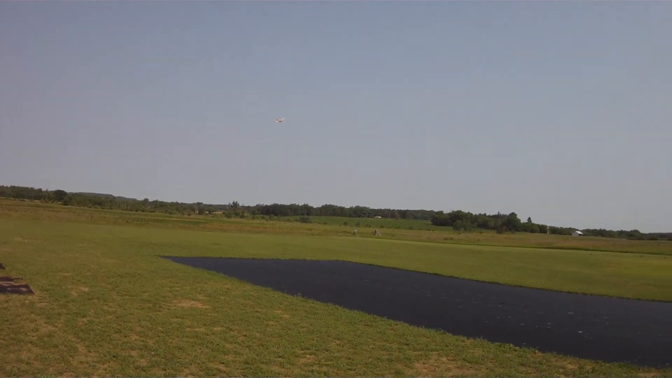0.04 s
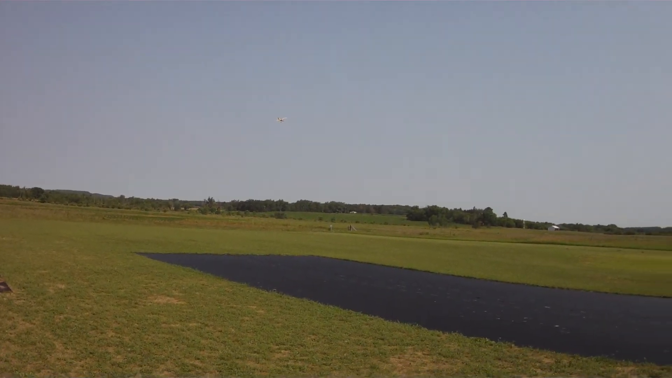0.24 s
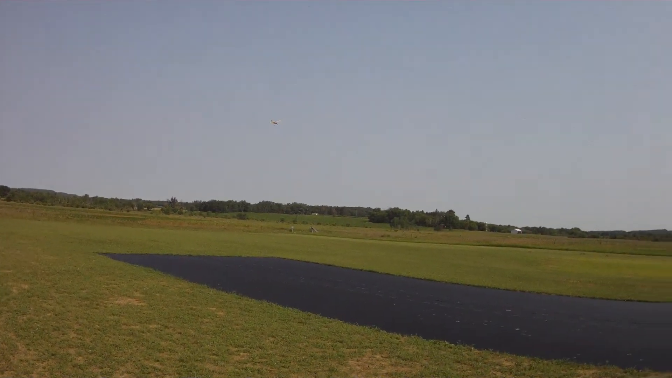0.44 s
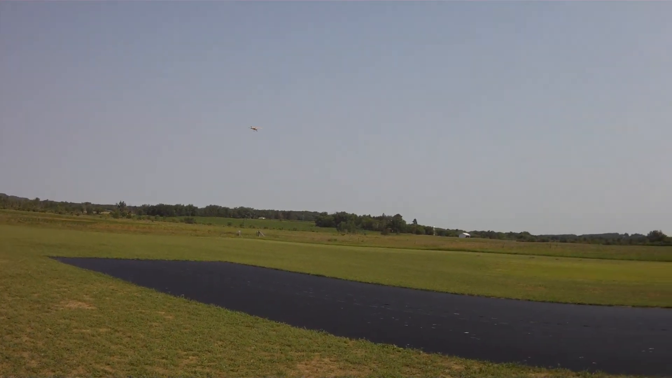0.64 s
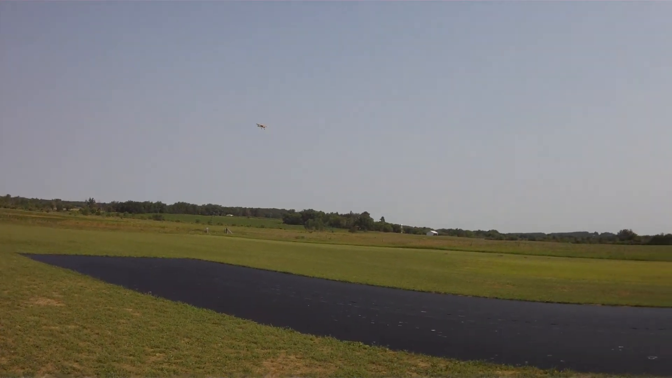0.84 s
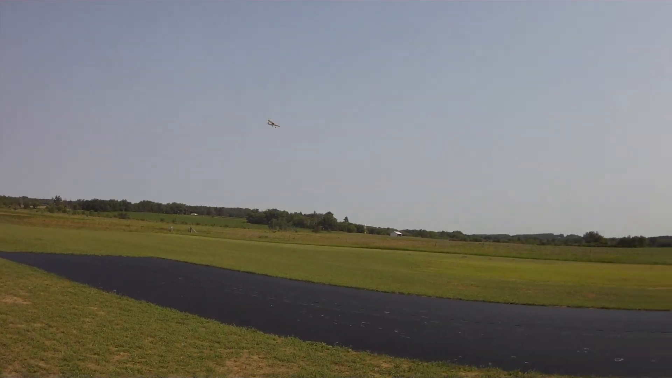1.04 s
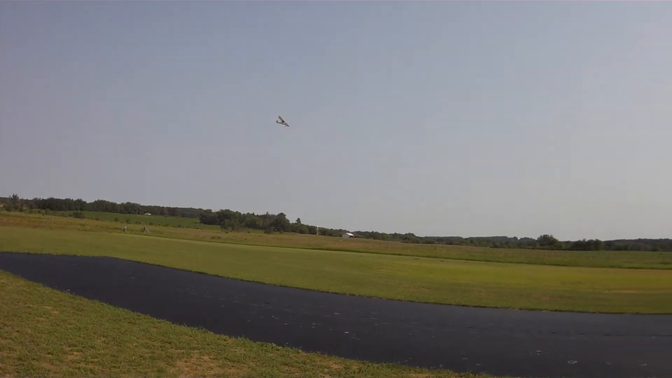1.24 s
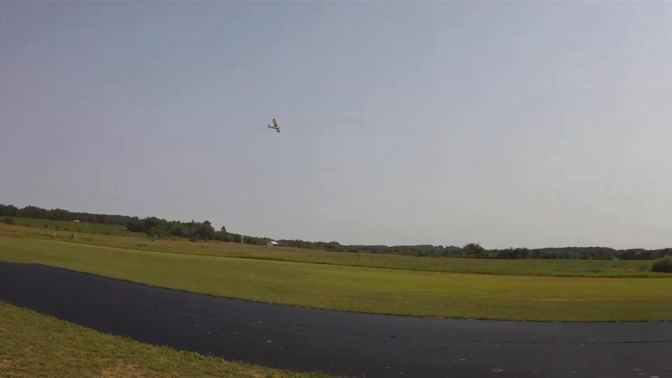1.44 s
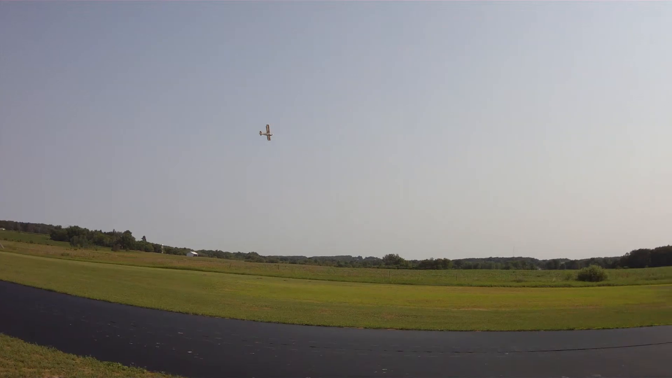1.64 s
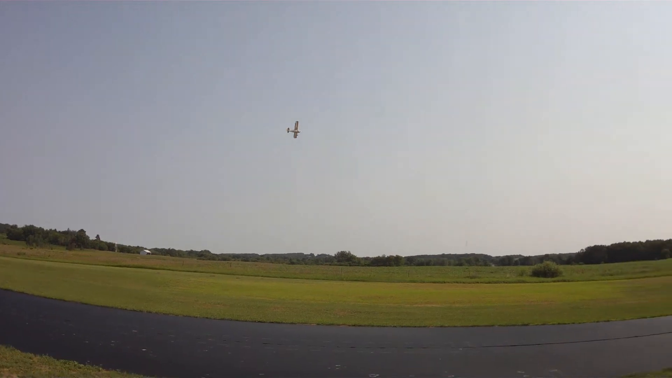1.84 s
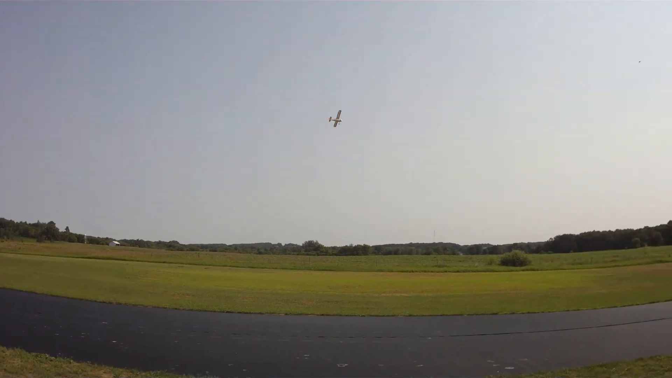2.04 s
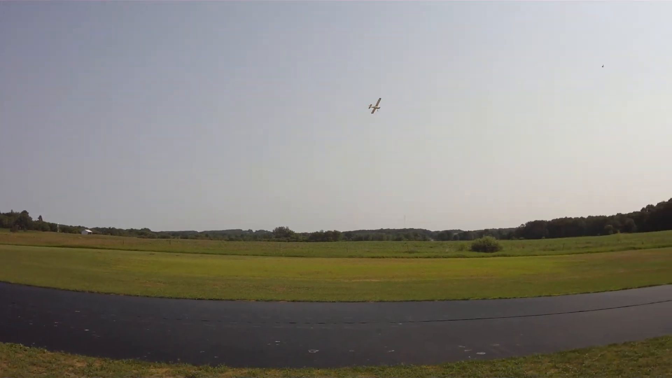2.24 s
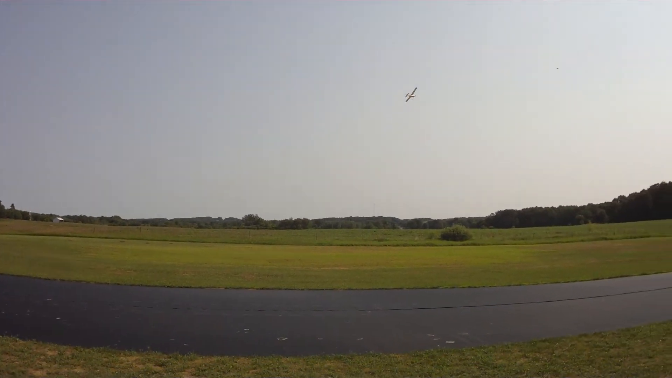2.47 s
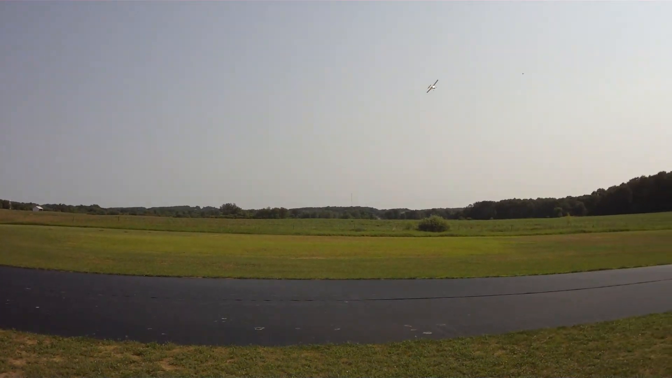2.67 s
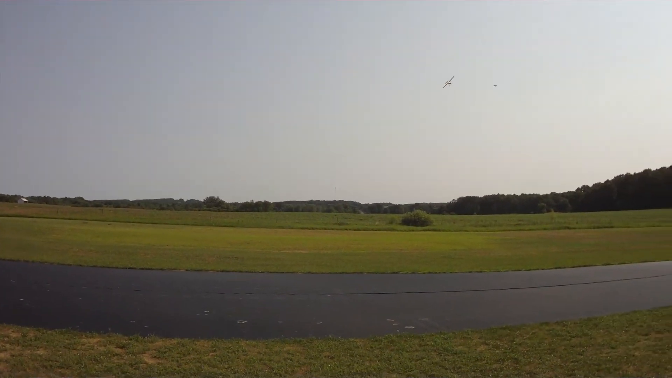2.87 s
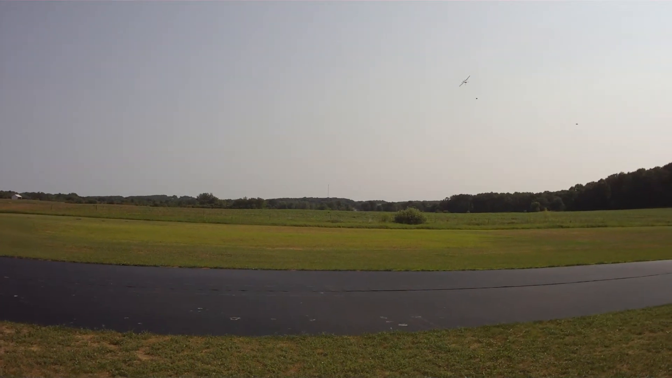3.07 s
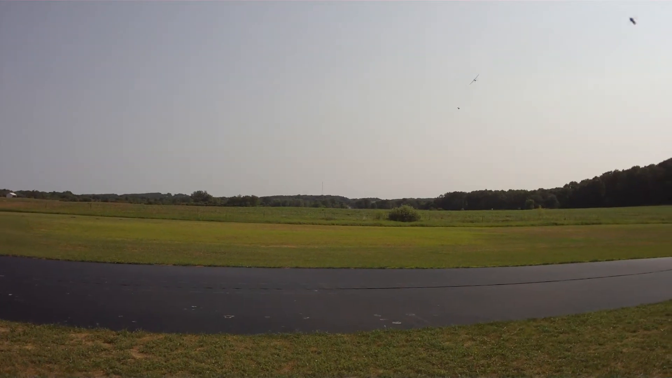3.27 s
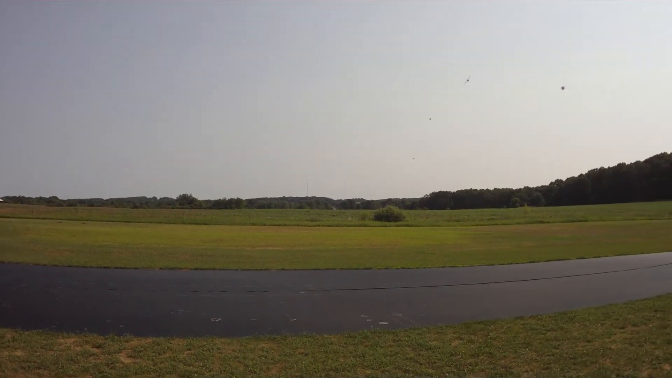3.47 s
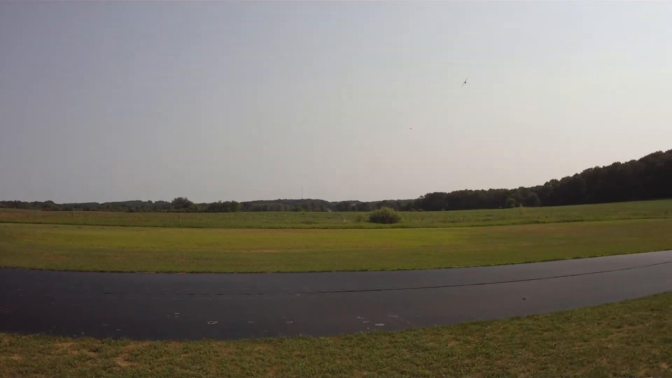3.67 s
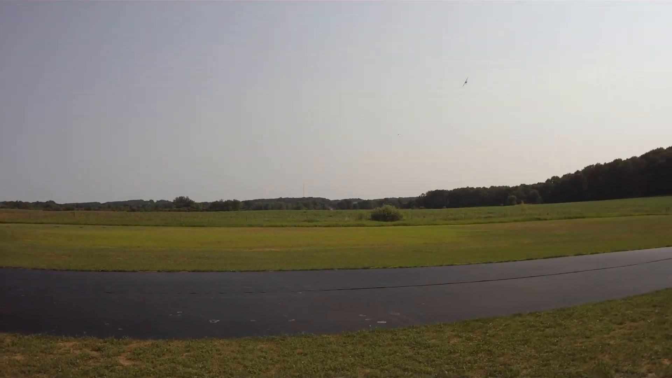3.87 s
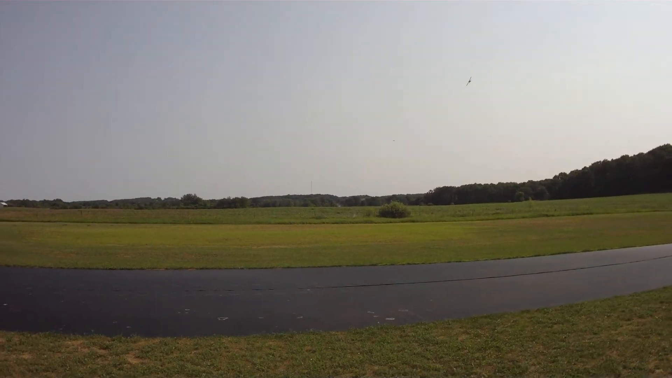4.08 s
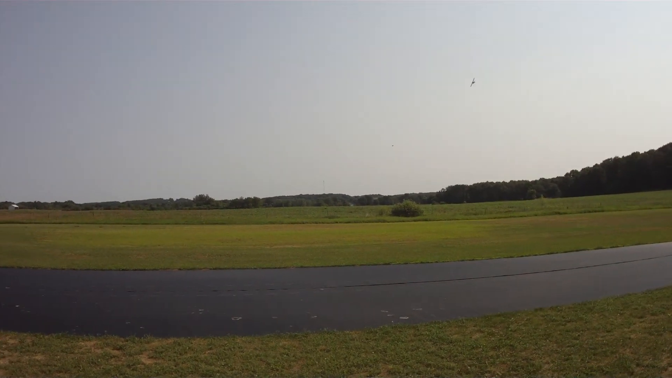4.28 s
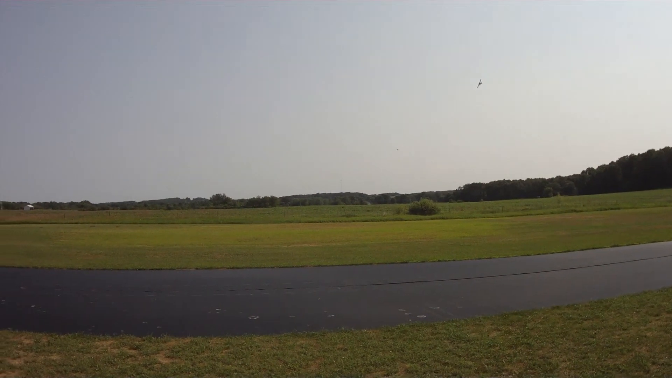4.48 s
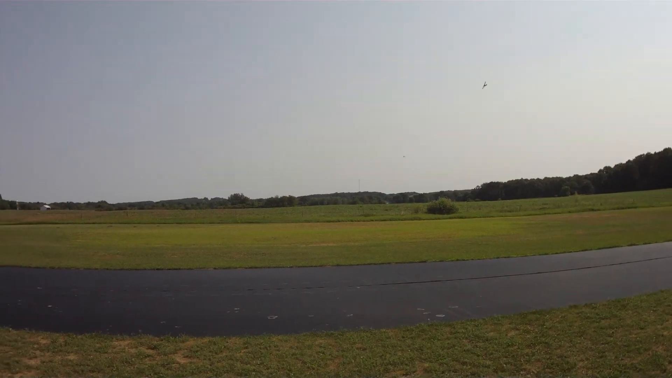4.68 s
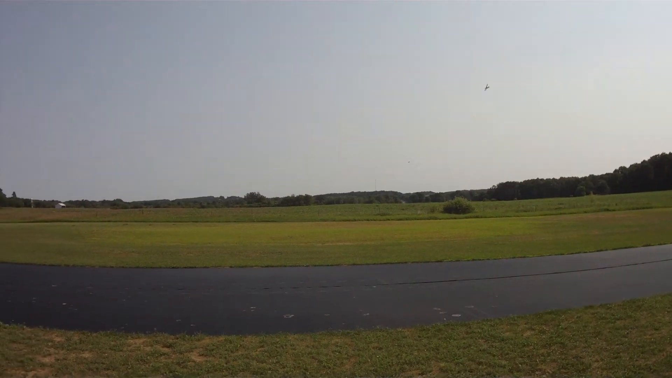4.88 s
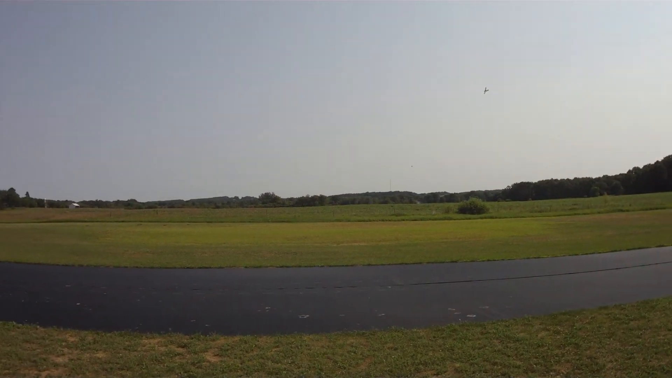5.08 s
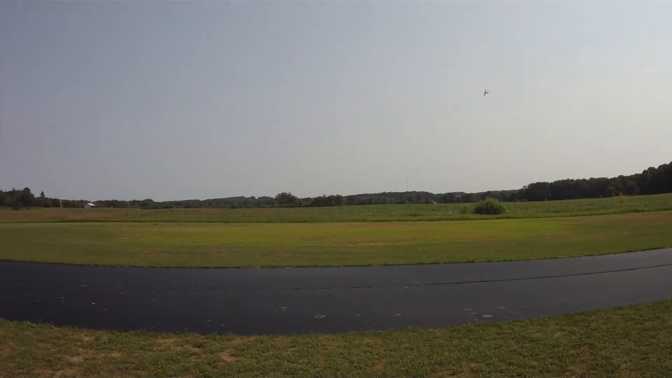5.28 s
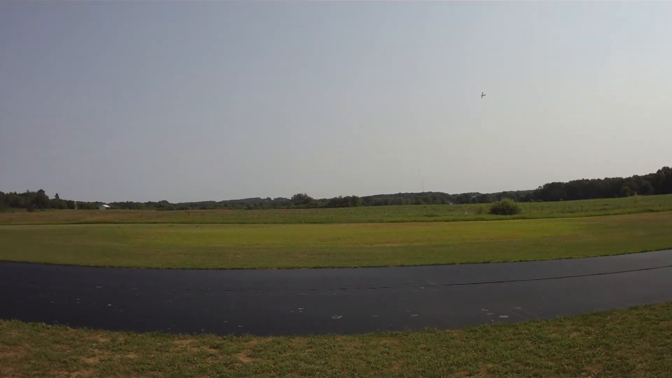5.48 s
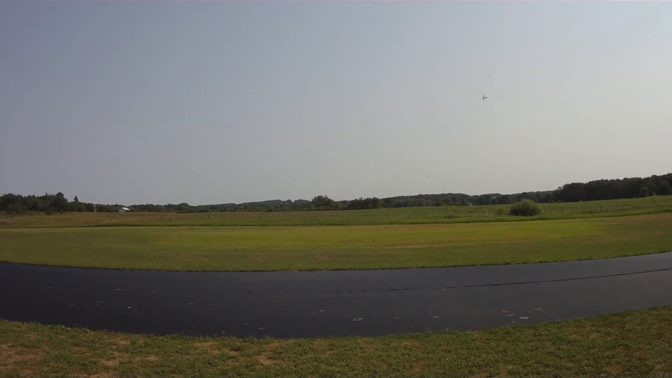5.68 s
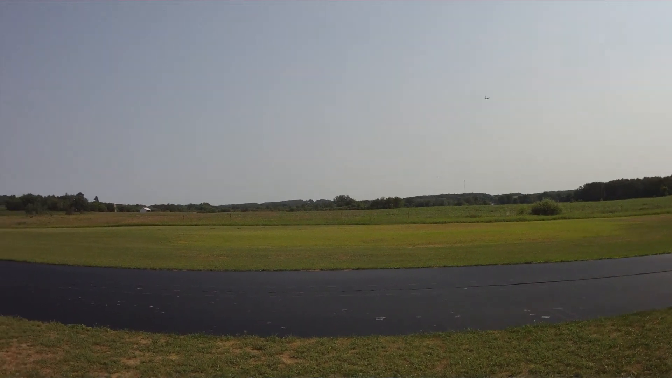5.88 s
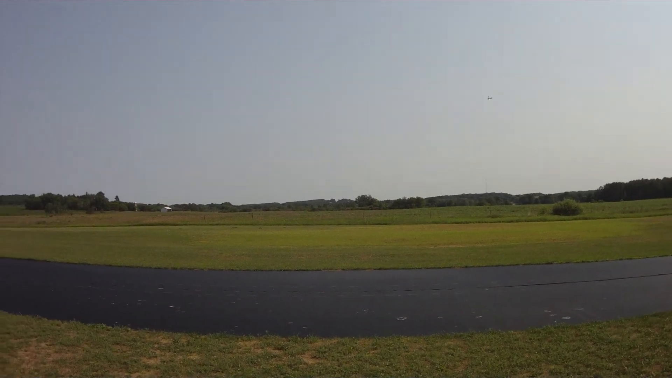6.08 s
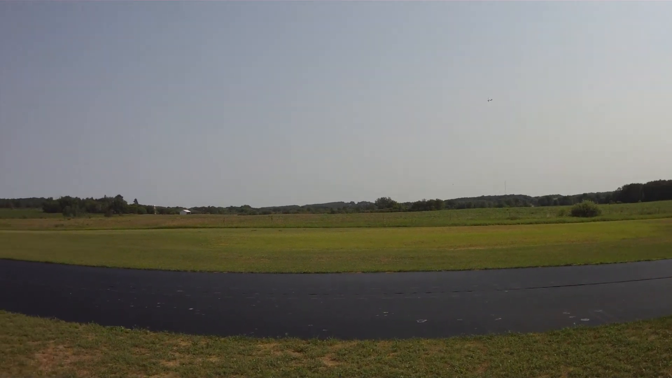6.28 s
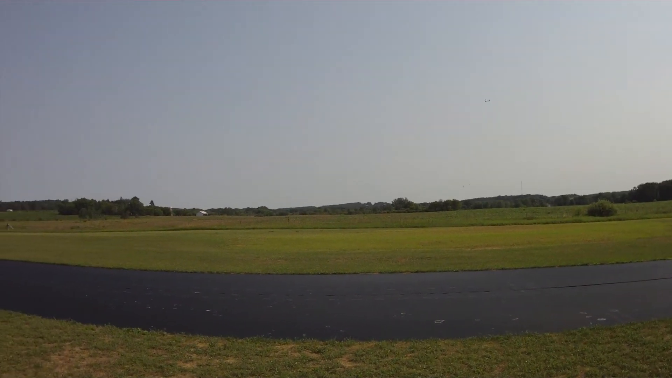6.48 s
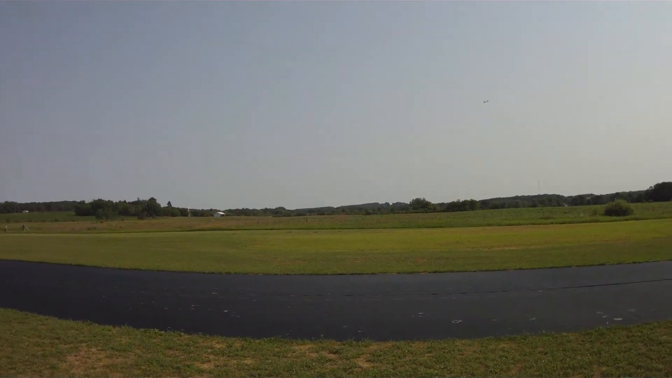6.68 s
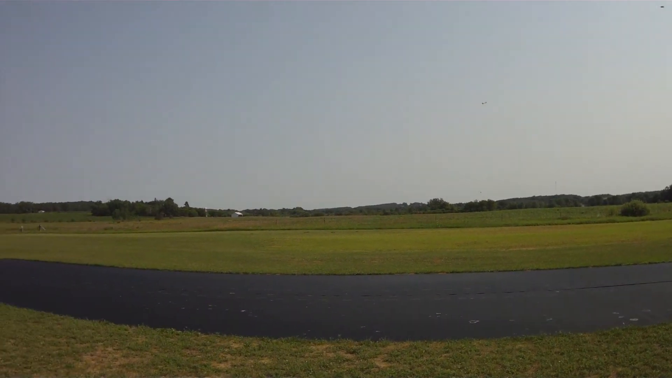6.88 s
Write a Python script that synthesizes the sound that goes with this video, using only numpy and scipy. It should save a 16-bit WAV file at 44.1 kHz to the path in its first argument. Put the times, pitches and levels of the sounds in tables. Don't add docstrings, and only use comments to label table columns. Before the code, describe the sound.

A small two-stroke model airplane sputters, revs up and buzzes past over a grass field, then recedes amid wind thumps and bird whistles.

```python
import sys
import numpy as np
from scipy import signal
from scipy.io import wavfile
from scipy.ndimage import uniform_filter1d, map_coordinates

SR = 44100
rng = np.random.default_rng(int(sys.argv[2]) if len(sys.argv) > 2 else 0)


def generate_wav(sig):
    pcm = np.round(np.clip(np.atleast_2d(sig).T, -1, 1) * 32767).astype(np.int16)
    wavfile.write(sys.argv[1], SR, pcm)


def ratio_of_db(decibels):
    return 10 ** (np.asarray(decibels, float) / 20)


N = 305172


def evened(x):
    return x / np.sqrt(np.mean(x ** 2) + 1e-20)


def along(rows):
    s, *columns = np.transpose(rows)
    return [np.interp(np.arange(N) / SR, s, c) for c in columns]


def colour(x, points):
    f, db = np.transpose(points)
    hz = abs(np.fft.fftfreq(2 ** 13, 1 / SR))
    log_gain = np.log(ratio_of_db(np.interp(np.log(hz + 1), np.log(f), db)))
    taps = np.fft.ifft(np.exp(np.conj(signal.hilbert(log_gain)))).real[:2 ** 11]
    return signal.oaconvolve(x, taps)[:N]


def drift(rate_hz):
    low_pass = signal.butter(2, rate_hz, fs=SR, output="sos")
    return evened(signal.sosfilt(low_pass, rng.standard_normal(N)))


def add(mix, s, sound):
    part = mix[max(round(s * SR), 0):][:len(sound)]
    part += sound[:len(part)]


def pick(x, turns, samples):
    spin = np.exp(2j * np.pi * turns)
    slow = x / spin
    for _ in range(2):
        slow = uniform_filter1d(slow.real, samples) + 1j * uniform_filter1d(slow.imag, samples)
    return 2 * (slow * spin).real


# f/Hz, level/dB
FIELD = [(30, -11), (100, -16), (300, -4), (1000, 1), (2500, -9.5), (4500, -14.5), (6500, -24.5),
         (8000, -40.5), (10500, -26.5), (12700, -21.5), (15000, -20)]


def field():
    return ratio_of_db(-53.5 + 0.56 * drift(2.4)) * evened(colour(rng.standard_normal(N), FIELD))


# t/s, level/dB
WIND = [(0.0, -61.5), (1.77, -70.5), (2.31, -62), (4.26, -64), (4.99, -56), (5.55, -69.5), (6.63, -54),
        (6.92, -60)]
# f/Hz, level/dB
GUST = [(15, -48), (40, -5), (100, 3.5), (200, 1.5), (350, -8.5), (700, -50)]


def wind_rumble():
    return ratio_of_db(along(WIND)[0] + 3.1 * drift(54)) * evened(colour(rng.standard_normal(N), GUST))


# t/s, f/Hz
SPEED = [(0, 158.2), (.27, 160.6), (.42, 165.6), (.61, 155.6), (.71, 160.5), (.95, 176.2), (1.35, 200.5),
         (1.46, 203.7), (1.75, 204.3), (2.37, 200), (3.31, 195.2), (3.85, 194.7), (4.66, 197.1),
         (5.86, 204.6), (6.05, 201.7), (6.17, 195.8), (6.61, 196), (6.92, 193.7)]


def shaft():
    hz = uniform_filter1d(along(SPEED)[0], SR // 16, mode="nearest")
    turns = np.cumsum(hz) / SR + .0018 * drift(60) + .005 * drift(8)
    return hz, turns


def firings(hz, turns, size):
    before = np.flatnonzero(np.diff(np.floor(turns)) > 0)
    place = before + (1 - turns[before] % 1) / (turns[before + 1] - turns[before])
    near = np.round(place).astype(int)[:, None] + np.arange(-8, 9)
    shape = np.sinc(near - place[:, None]) * np.hanning(19)[1:-1]
    height = (size * SR / hz / np.sqrt(2))[before, None]
    out = np.zeros(N)
    np.add.at(out, np.clip(near, 0, N - 1), height * shape)
    return out


MISFIRES = [.147, .303, .322, .46, .481, .515, .527, .552, .687, .842, .957]


def uneven_firings(hz, turns, luck):
    full_hz, idle_hz = 195, 157
    slow = np.clip((full_hz - hz) / (full_hz - idle_hz), 0, 1)
    uneven = .055 + (.52 - .055) * slow ** 1.2
    turn = turns.astype(int)
    weak = np.isin(turn, turn[(np.array(MISFIRES) * SR).astype(int)])
    return firings(hz, turns, np.where(weak, -.8, uneven * np.minimum(luck, 1.2)))


# t/s, delay/ms
ECHO = [(0, 2.25), (.45, 2.13), (1.2, 2.39), (1.75, 2.82), (2.3, 2.77), (3.5, 2.94), (4.1, 2.984),
        (4.75, 2.76), (5.7, 2.81), (6.92, 3.13)]


def ground_echo(x):
    t = np.arange(N) / SR
    near, far, far_s = 0.54, 0.31, 5.14
    share = near + (far - near) / (1 + np.exp((far_s - t) / .3))
    late = np.arange(N) - along(ECHO)[0] * SR / 1000
    return np.clip(share, 0, 1) * map_coordinates(x, [late], order=3)


# t/s, exhaust level/dB, propeller level/dB, how far the pipe faces us as treble level/dB
FLIGHT = [(0, -46, -74, -9.5), (.35, -46.5, -62, -1.5), (.53, -47.5, -69, -5), (.85, -43.5, -54, -1.5),
          (1.2, -40.5, -61.5, 1), (1.45, -36.5, -49, -4.5), (2.0, -37.5, -46.5, 3.5), (2.2, -39, -42, 3.5),
          (2.5, -36, -43, -1), (2.95, -42, -46, 5), (3.55, -44.5, -48, -1.5), (3.95, -54.5, -48, 5.5),
          (4.7, -50.5, -42.5, -2.5), (5.1, -56, -44, 7), (5.7, -47.5, -42.5, 1.5), (6.05, -49, -45.5, -3.5),
          (6.5, -51.5, -48, 4), (6.92, -54.5, -50.5, 11)]
# f/Hz, level/dB
MUFFLER = [(180, -29), (400, -24), (480, -9), (600, -5.5), (800, -4), (1000, -1.5), (1200, -0.5),
           (1400, -3.5), (1650, -5.5), (1900, -13), (2150, -15.5), (2400, -16), (2900, -42), (3600, -51)]


def exhaust(steady, scatter):
    exhaust_db, _, bright_db = along(FLIGHT)
    low_scatter = signal.lfilter(*signal.butter(2, 1700, fs=SR), 1.1 * scatter)
    ring = colour(steady + low_scatter, MUFFLER)
    dull = signal.lfilter(*signal.butter(1, 1400, fs=SR), ring)
    direct = ratio_of_db(exhaust_db + 0.91 * drift(4.2)) * (dull + ratio_of_db(bright_db) * (ring - dull))
    return direct + ground_echo(direct)


def propeller(turns):
    level = ratio_of_db(along(FLIGHT)[1] + 0.47 * drift(5.8))
    return np.sqrt(2) * level * np.cos(2 * np.pi * (2 * turns + 0.14))


def air_puffs(turns, luck):
    surge = np.exp(-(turns % 1) / 0.16) * ratio_of_db(2.2 * luck)
    return (1.6 + surge) * rng.standard_normal(N)


# f/Hz, level/dB
RUSH = [(150, -18), (350, -4.5), (700, 3), (1000, 1.5), (1500, 4), (2100, -5.5), (2800, -10), (4000, -36)]


def air_rush(puffs):
    exhaust_db = uniform_filter1d(along(FLIGHT)[0], SR // 4)
    return ratio_of_db(0.6 * exhaust_db - 25.5) * evened(colour(puffs, RUSH))


def scattered(x):
    t = np.arange(300) / SR
    echoes = rng.standard_normal((3, len(t))) * ratio_of_db(-60 * t / .018 - 19)
    turn = np.arange(N) / SR / 2.153
    out = x.copy()
    for k in range(3):
        out += np.cos(2 * np.pi * (turn + k / 3)) * signal.oaconvolve(x, echoes[k])[:N]
    return out


# t/s, level/dB
RASP = [(0, -69), (.5, -66), (.9, -61), (1.3, -54.5), (1.6, -54), (1.95, -51.5), (2.2, -54), (2.7, -57),
        (3.4, -58), (3.7, -72.5), (4.3, -74.5), (5.8, -70.5), (6.5, -73), (6.6, -63.5), (6.7, -73),
        (6.92, -65)]
# f/Hz, level/dB
RATTLE = [(1800, -37.5), (2600, -0.5), (3200, -0.5), (4200, -1.5), (5000, -4), (6000, -21.5)]
# t/s, f/Hz
PANEL = [(0, 3800), (.6, 3820), (1.3, 4600), (2.05, 4600), (2.4, 4100), (3.0, 3550), (6.92, 3630)]


def airframe_rattle(knock):
    rattle = ratio_of_db(along(RASP)[0] - 2.1 + 1.37 * drift(11.4)) * evened(colour(knock, RATTLE))
    return rattle + 1.2 * pick(rattle, np.cumsum(along(PANEL)[0]) / SR, 50)


# f/Hz, level/dB
BUZZ = [(4500, -27.5), (5600, 12), (6500, 3), (8200, -2), (9500, 6), (11000, -40)]


def airframe_buzz(knock, shimmer):
    buzz_db = -62.2 + 0.89 * (along(RASP)[0] + 55.5)
    return ratio_of_db(buzz_db + 2.0 * shimmer) * evened(colour(knock, BUZZ))


# f/Hz, level/dB
JET = [(7000, -32.5), (9000, 4.5), (10500, -2.5), (12500, -7), (15500, -25)]


def jet_hiss(knock, steady, shimmer):
    away = 1 / (1 + np.exp((2.6 - np.arange(N) / SR) / 0.037))
    jet_db = np.maximum(-63 + 1.7 * (along(RASP)[0] + 53.5) - 31 * away, -97)
    return ratio_of_db(jet_db + 3.0 + 3.1 * shimmer) * evened(colour(knock + .7 * evened(steady), JET))


# centre t/s, length t/s, order, level/dB
FADES = [(0.97, 0.32, 1, 16), (2.32, 0.47, 1, 10.5), (5.75, .3, 4, 3), (3.71, 0.76, 4, -10.5),
         (6.85, 0.19, 6, -8), (1.9, 0.24, 6, 1), (6.33, 0.99, 4, 5.5), (0.14, 1, 5, 4), (1.48, 0.26, 5, -9),
         (0.67, .6, 14, -22), (2.3, 0.18, 4, -6), (5, 0.46, 5, -7), (6.94, 0.26, 5, -9),
         (2.91, 0.35, 6, -11), (4.19, 0.56, 6, 13), (5.495, 0.42, 6, 6.5), (0.32, 0.61, 7, -12),
         (1.54, 0.69, 7, 4), (3.48, 0.43, 7, 4), (4.5, .6, 7, -10), (6.71, 0.43, 7, -7.5), (2.53, 1, 8, 11),
         (2.6, 0.7, 5, 5.5), (0.29, 0.74, 10, 8.5), (2.16, 1, 10, 9), (0.26, 0.72, 12, 6.5),
         (4.943, 0.74, 11, 7), (6, .48, 11, -18), (1.848, 0.59, 12, -13), (2.675, 0.47, 12, 5.5)]


def shaded(x, turns):
    t = np.arange(N) / SR
    out = x.copy()
    for order in np.unique([row[2] for row in FADES]):
        db = np.zeros(N)
        for centre, length, k, peak_db in FADES:
            if k == order:
                db += peak_db * np.exp(-2 * ((t - centre) / length) ** 2)
        out += (ratio_of_db(db) - 1) * pick(x, order * turns, 260)
    return out


def airplane():
    hz, turns = shaft()
    luck = np.clip(rng.standard_normal((2000, 2)), -2, 2)[turns.astype(int)]
    steady = firings(hz, turns, 0.87)
    pipe = exhaust(steady, uneven_firings(hz, turns, luck[:, 0]))
    puffs = air_puffs(turns, luck[:, 1])
    knock = evened(scattered(steady)) + .5 * evened(puffs)
    shimmer = np.tanh(drift(24))
    body = airframe_rattle(knock) + airframe_buzz(knock, shimmer)
    air = jet_hiss(knock, steady, shimmer) + air_rush(puffs)
    return shaded(pipe + body, turns) + propeller(turns) + air


def tweet(hz, db):
    n = len(hz)
    flutter = 3 * evened(uniform_filter1d(uniform_filter1d(rng.standard_normal(n), 130), 130))
    tone = np.sin(2 * np.pi * np.cumsum(hz * (1 + .004 * flutter)) / SR)
    return np.sqrt(2) * ratio_of_db(db + flutter) * tone * signal.windows.tukey(n, min(.5, 500 / n))


# t/s, length t/s, start f/Hz, end f/Hz, level/dB
CHIRPS = [
    (.025, 0.018, 3170, 2920, -67),
    (0.26, .032, 3350, 2880, -59),
    (0.36, 0.018, 3670, 4400, -52),
    (0.371, 0.0106, 4450, 3760, -57),
    (0.362, 0.024, 2280, 2800, -58),
    (.396, 0.0274, 3440, 2820, -56),
    (.759, .014, 4600, 5250, -62),
    (3.849, 0.05, 4723, 4620, -74),
    (4.225, .037, 5100, 4950, -71),
    (5.773, .018, 4700, 4750, -59.5),
]
# t/s after the start, length t/s, start f/Hz, end f/Hz, level/dB
FALLING = [
    (0, 0.0096, 4803, 4040, -1),
    (.02, 0.026, 3800, 3490, -3),
]
RISING = [
    (0, .011, 6300, 6840, -5),
    (.008, .012, 4940, 5600, 1),
]
# t/s, level/dB
FALLS = [
    (.607, -57.5),
    (.768, -51.5),
    (.93, -54),
    (4.652, -61.5),
]
RISES = [
    (.706, -62),
    (.868, -59),
    (.937, -61),
]


def chirps():
    out = np.zeros(N)
    events = list(CHIRPS)
    for notes, starts in ((FALLING, FALLS), (RISING, RISES)):
        for s, db in starts:
            for after, length, start_hz, end_hz, note_db in notes:
                events.append((s + after, length, start_hz, end_hz, db + note_db))
    for s, length, start_hz, end_hz, db in events:
        add(out, s, tweet(np.linspace(start_hz, end_hz, round(length * SR)), db))
    return out


# t/s, f/Hz, level/dB
WHISTLES = [
    [(3.995, 3910, -65), (4.01, 3200, -68), (4.045, 2760, -61), (4.13, 2816, -62)],
    [(4.32, 4386, -83), (4.35, 3740, -59), (4.37, 3500, -59.5), (4.42, 3520, -59)],
    [(4.815, 3810, -64), (4.86, 3497, -64), (4.92, 3297, -69), (5.04, 3238, -59), (5.07, 3770, -68)],
    [(5.26, 4100, -64), (5.32, 3363, -60), (5.38, 2567, -61), (5.47, 2558, -63), (5.53, 2884, -60),
     (5.55, 3250, -65), (5.585, 3310, -59)],
    [(5.88, 3002, -60), (5.895, 2460, -60), (5.925, 2110, -62)],
    [(6.09, 2230, -72), (6.145, 2400, -64)],
]


def whistles():
    out = np.zeros(N)
    for rows in WHISTLES:
        s, hz, db = np.transpose(rows)
        t = np.arange(s[0], s[-1], 1 / SR)
        add(out, s[0], tweet(np.interp(t, s, hz), np.interp(t, s, db)))
    return out


def birds():
    calls = chirps() + whistles()
    t = np.arange(SR // 5) / SR
    trees = rng.standard_normal(len(t)) * ratio_of_db(-60 * t / 0.3)
    return calls + ratio_of_db(-5) * signal.oaconvolve(calls, trees / np.linalg.norm(trees))[:N]


# t/s, peak level/dB
THUMPS = [(2.225, -55), (2.873, -33), (2.947, -32), (2.993, -31), (3.024, -35), (3.533, -30),
          (3.542, -25.5), (4.003, -51), (4.053, -38), (4.169, -35), (4.188, -38), (4.571, -38),
          (4.647, -39.5), (4.782, -35), (4.811, -38), (5.017, -38), (5.775, -30), (5.791, -34.5),
          (5.835, -34), (5.877, -37), (5.9, -32), (6.031, -39), (6.334, -31.5), (6.346, -33.5),
          (6.378, -34.5), (6.406, -37), (6.438, -38), (6.623, -41), (6.748, -35.5), (6.914, -46)]


def wind_thumps():
    out = np.zeros(N)
    t = (np.arange(800) - 400) / SR
    eddies = list(THUMPS)
    for s, _ in THUMPS:
        for off, size in rng.standard_normal((2, 2)):
            eddies.append((s + .04 * off, -43.5 - 3 * abs(size)))
    for s, db in eddies:
        turn, luck = rng.random(2)
        hz = (220 + 7 * (db + 35)) * (1 + .15 * (2 * luck - 1))
        push = np.cos(2 * np.pi * (hz * t + turn)) * np.exp(-(t * hz / 0.29) ** 2)
        push = np.tanh(ratio_of_db(db + 37.0) * push) / np.tanh(ratio_of_db(db + 40.0))
        add(out, s + t[0], ratio_of_db(db + 3.5) * (push - push.mean()))
    return out


def scene():
    return (field() + wind_rumble() + airplane() + birds() + wind_thumps())[None]


def top_cut(x):
    return signal.sosfilt(signal.butter(12, 15590, fs=SR, output="sos"), x)


def record(dry):
    notch_hz, notch_width_hz, edge_hz = 9100, 3160, 15420
    x = signal.lfilter(*signal.iirnotch(notch_hz, notch_hz / notch_width_hz, SR), dry)
    low_pass = signal.firwin(1023, edge_hz, window=("kaiser", 9), fs=SR)
    x = signal.oaconvolve(x, low_pass[None], "same")
    return top_cut(x)


dry = scene()
out = record(dry)
generate_wav(out)
```